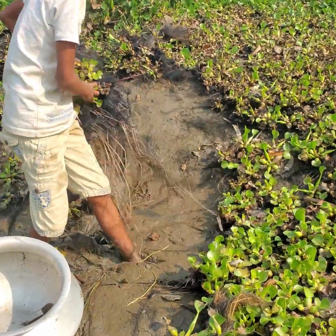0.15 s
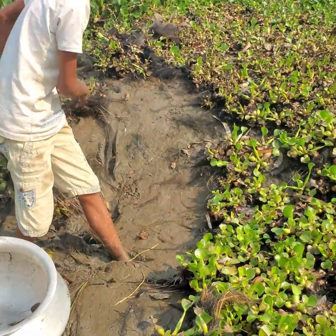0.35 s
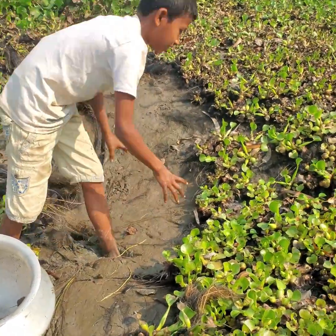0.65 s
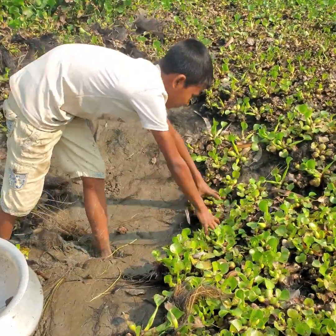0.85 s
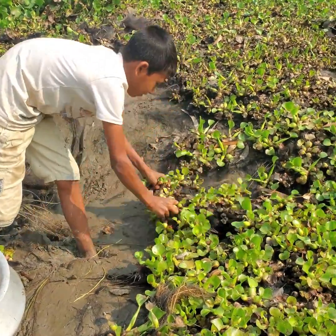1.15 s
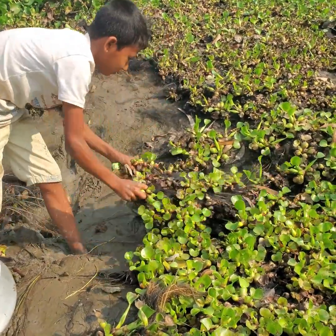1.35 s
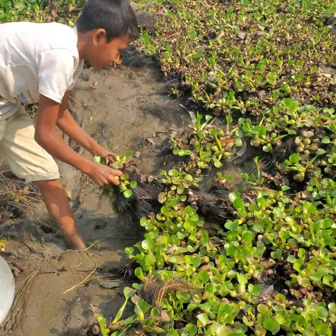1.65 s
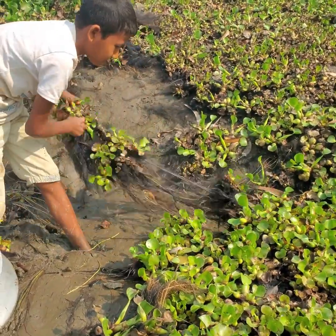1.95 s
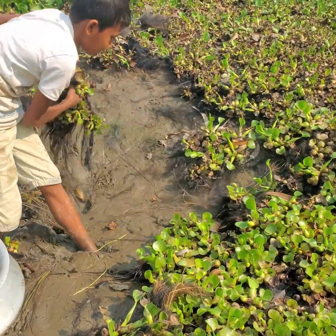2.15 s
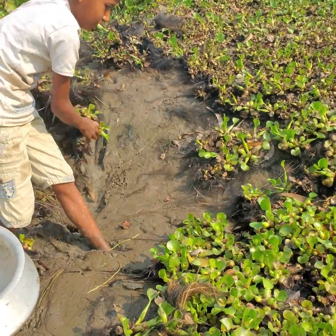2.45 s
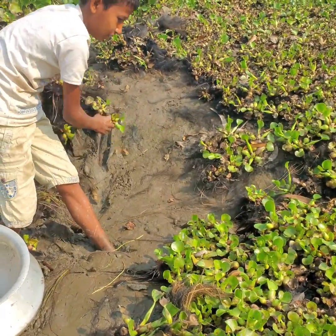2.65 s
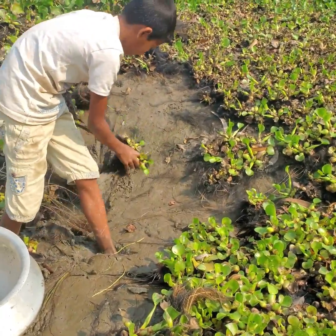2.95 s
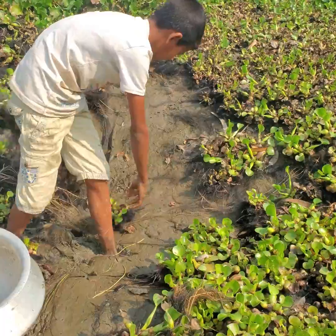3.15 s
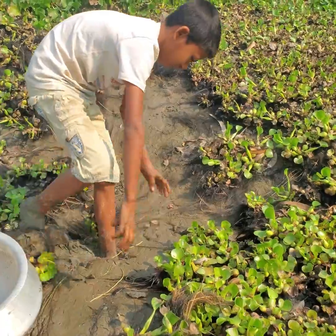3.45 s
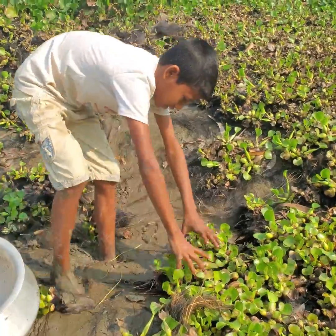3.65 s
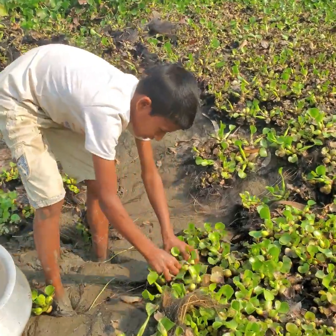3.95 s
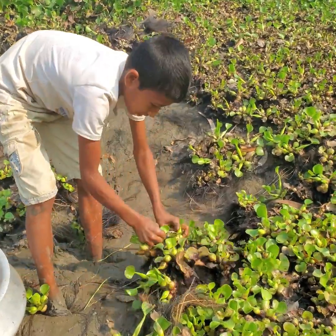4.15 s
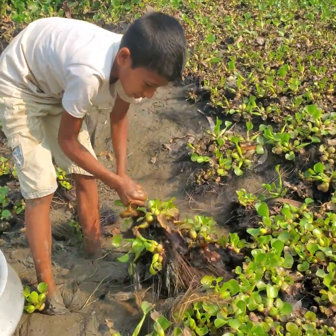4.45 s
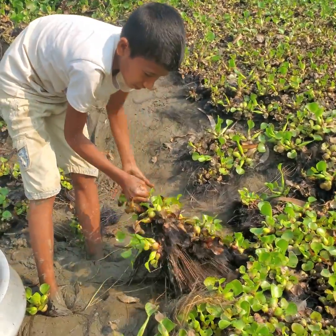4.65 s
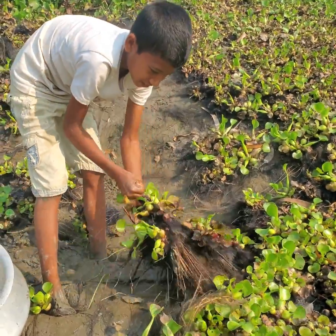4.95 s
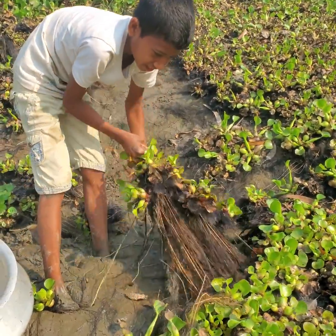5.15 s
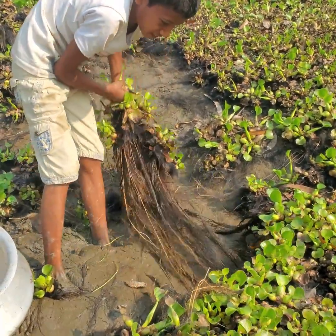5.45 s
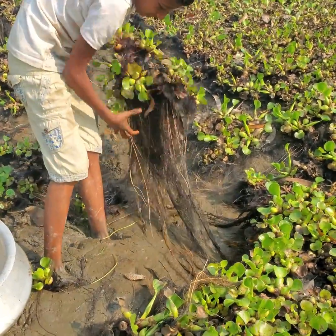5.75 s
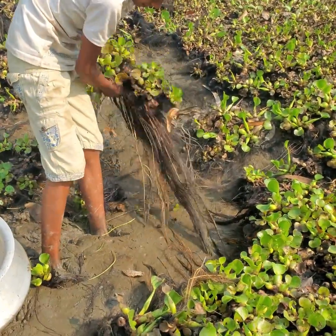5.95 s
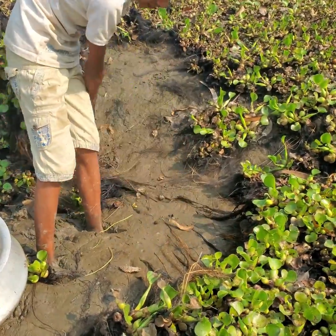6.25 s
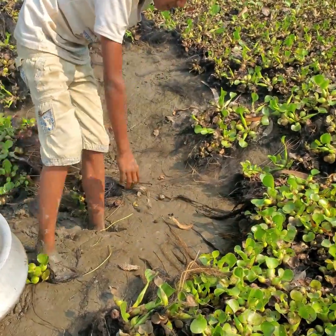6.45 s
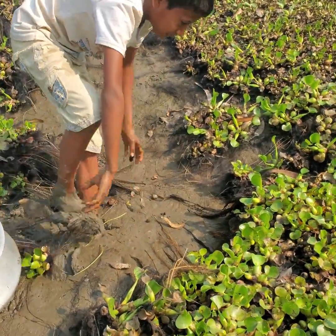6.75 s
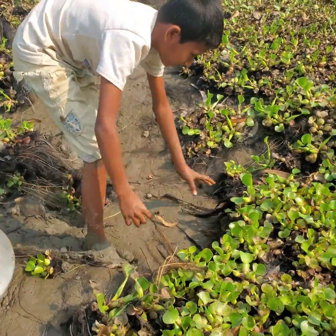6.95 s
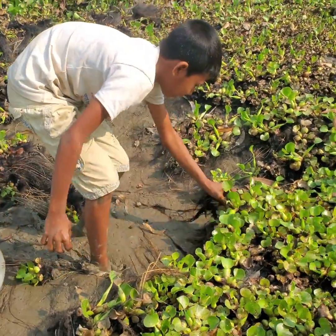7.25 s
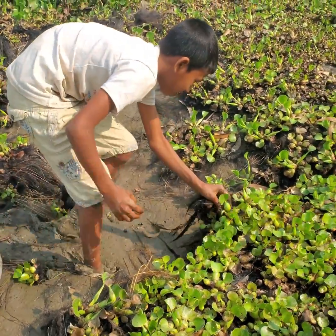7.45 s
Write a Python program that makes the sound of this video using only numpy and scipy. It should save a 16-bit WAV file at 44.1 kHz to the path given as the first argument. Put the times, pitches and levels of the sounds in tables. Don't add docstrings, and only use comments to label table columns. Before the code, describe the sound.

Outdoors at a quiet pond edge, heard very close in stereo. Leafy rustles and dry crackling fibres come in uneven tugs, densest midway, with sharp hollow stem snaps, duller root breaks and wet mud plops. Behind them are soft wind, a far low engine that fades away, quick sliding bird whistles to the right, and late, a faint insect chirr. The tearing continues to the end.

```python
import sys
import numpy as np
from scipy import signal
from scipy.fft import rfft, irfft, next_fast_len
from scipy.io import wavfile
from scipy.ndimage import uniform_filter1d, map_coordinates

SR = 44100
rng = np.random.default_rng(int(sys.argv[2]) if len(sys.argv) > 2 else 0)


def transcribe(signal):
    frames = np.atleast_2d(signal).T
    limited = np.clip(frames, -1, 1)
    pcm = np.round(limited * 32767).astype(np.int16)
    wavfile.write(sys.argv[1], SR, pcm)


def natural_amplitude(level_db):
    exponent = np.asarray(level_db, float) / 20
    return 10 ** exponent


N = 335326

# (time [s], fade time [s], leaves level [dB], root fizz over leaves [dB])
PULLS = [(.0, 0.22, -64, -4), (.3, 0.045, -56, -16), (.62, 0.31, -55.5, -5.5), (.95, 0.26, -49, -4),
         (1.2, 0.26, -50.5, -3), (1.46, 0.068, -55, -5), (1.67, 0.092, -54.5, -2.5),
         (1.93, 0.12, -57.5, -1.5), (2.13, 0.29, -54, -3), (2.5, 0.21, -60, -4.5), (2.94, 0.051, -54.5, -6),
         (3.22, 0.061, -49, -9), (3.34, 0.33, -54.5, -6), (3.82, 0.33, -49, -7), (3.99, 0.29, -46.5, -4.5),
         (4.11, 0.12, -45, -1), (4.443, 0.12, -46, -2), (4.89, 0.064, -46.5, -5.5),
         (5.079, 0.14, -49, -4.5), (5.28, 0.77, -61.5, -1), (5.787, 0.1, -55, 0),
         (5.98, 0.088, -54.5, -0.5), (6.295, 0.13, -57.5, -0.5), (6.529, 0.13, -51.5, -2),
         (6.661, 0.024, -51, 2), (6.983, 0.059, -51.5, -0.5), (7.35, 0.15, -54.5, -6.5),
         (7.6, 0.15, -58, -5)]


def plants():
    shake = wobble(35)
    return mud_smacks(shake) + leaves(shake) + root_fizz(shake)


def leaves(shake):
    # (frequency [Hz], level [dB per Hz])
    colour = [(700, -18), (1200, -18), (1700, -8), (2600, -2), (3500, 0.5), (4500, 4), (5900, -5.5),
              (7600, -11.5), (10000, -83)]
    level_db = swells([row[:3] for row in PULLS], idle_db=-71.5)
    grains = crackle(count=3000, hz=4170, octaves=0.52, cycles=10.4, spread_db=1.0)
    rustle = rush(colour, patchy_db=3.5) + 0.6 * grains
    return natural_amplitude(level_db + 4.5 + 2.34 * shake) * rustle


def root_fizz(shake):
    # (frequency [Hz], level [dB per Hz])
    colour = [(6000, -64), (8000, -8.5), (9500, 0.5), (11500, -2), (13000, -4.5), (15600, -10),
              (16800, -25)]
    efforts = [(s, 0.85 * fade_s, db + over_db) for s, fade_s, db, over_db in PULLS]
    level_db = swells(efforts, idle_db=-72)
    grains = crackle(count=1200, hz=11000, octaves=.5, cycles=2.5, spread_db=5.2)
    ticks = filtered(grains, lambda hz: natural_amplitude(along(colour, hz)))
    hiss = rush(colour, patchy_db=3.5)
    return natural_amplitude(level_db - 1.0 + 2.3 * shake) * (hiss + 0.66 * unit(ticks))


def mud_smacks(shake):
    # (time [s], fade time [s], level [dB])
    smacks = [(0, 0.2, -54), (.3, 0.17, -47.5), (.62, 0.073, -51), (.95, 0.45, -53), (1.55, 0.12, -59),
              (1.92, 0.43, -56.5), (2.2, 0.043, -46), (2.94, 0.2, -59), (3.34, 0.076, -48),
              (3.84, 0.31, -49), (4.11, 0.072, -47.5), (4.44, 0.092, -56), (4.88, 0.059, -49.5),
              (5.18, 0.35, -58), (5.79, 0.039, -54.5), (6.05, 0.17, -54.5), (6.5, 0.22, -53),
              (6.66, 0.011, -45), (6.98, 0.13, -52.5), (7.49, 0.12, -52)]
    # (frequency [Hz], level [dB per Hz])
    colour = [(200, -70), (400, -7), (900, -2), (1500, -5.5), (2200, -5), (4000, -24.5)]
    level_db = swells(smacks, idle_db=-69.0)
    grains = crackle(count=900, hz=1020, octaves=1.0, cycles=2.2, spread_db=-4.0)
    mud = rush(colour, patchy_db=4.0) + .5 * grains
    return natural_amplitude(level_db - 2.5 + 0.83 * shake) * mud


def snaps():
    # (time [s], peak level [dB], ring frequency [Hz], crack level [dB])
    stems = [(0.54, -28.5, 4300, -36), (1.0915, -26.5, 4900, -22), (1.2063, -23.5, 4300, -8),
             (1.3907, -29, 4700, -15.5), (1.4527, -21, 4380, -13), (1.503, -32, 4650, -32),
             (2.1036, -24.5, 5700, -13), (2.134, -28.5, 4600, -29), (2.4408, -40, 5500, -32),
             (2.952, -28.5, 4140, -21), (3.32, -28.5, 4600, -28), (3.5877, -33.5, 4450, -11.5),
             (3.8358, -18.5, 4800, -11), (4.0142, -24, 4760, -21), (4.0692, -22, 4530, -19),
             (4.1254, -26.5, 4600, -23), (4.4353, -20, 3700, -15), (4.4557, -24.5, 3600, -19),
             (4.4892, -19.5, 4330, -14), (5.035, -37, 3970, -11), (5.0886, -26, 3770, -32),
             (5.2060, -15.5, 4400, -16), (5.3125, -33.5, 5150, -22), (5.3655, -32, 4530, -17),
             (5.7317, -31, 4260, -27), (6.044, -24, 4100, -33), (6.0545, -12.5, 4960, -22),
             (6.1055, -30.5, 4100, -26), (6.651, -27.5, 5900, -15), (7.3118, -27.5, 3900, -17)]
    # (time [s], peak level [dB], ring frequency [Hz], crack level [dB])
    roots = [(0.2965, -41, 2270, -5.5), (1.072, -28, 4200, -16), (1.6527, -36, 3200, -9),
             (2.8432, -36.5, 2710, -37), (2.9243, -42, 2600, -8), (3.174, -35, 2870, -35),
             (3.203, -32, 3160, -31), (3.2276, -24, 2660, -31), (3.2797, -30.5, 3150, -1),
             (3.2873, -36, 3020, -4), (3.6607, -31, 3940, -20), (4.401, -28, 3050, -17),
             (4.5172, -22.5, 3080, -11.5), (4.8876, -24, 3500, -18), (5.449, -40.5, 3850, -15),
             (5.7902, -32.5, 2760, -26), (6.118, -27.5, 3170, -19), (6.965, -41, 2400, -18),
             (7.5094, -39, 3160, -30)]
    # (time [s], peak level [dB], ring frequency [Hz], crack level [dB])
    thick = [
        (1.5462, -40.5, 2470, -14),
        (2.166, -30, 1860, -23),
        (2.1928, -23.5, 2110, -40),
        (3.3364, -28, 1560, -20),
        (5.9832, -30.5, 2280, -24),
        (6.055, -18.5, 2240, -24),
        (6.9842, -27, 2050, -30),
        (7.3514, -32, 1620, -30),
        (7.42, -24.5, 2000, -19.5),
    ]
    out, t = np.zeros((2, N)), np.arange(2048) / SR
    f = np.fft.rfftfreq(2048, 1 / SR)
    delayed = lambda s: np.exp(-2j * np.pi * f * s)
    stalk = lambda hz, wide: 1j * f * wide / (hz * hz - f * f + 1j * f * wide)
    fade = (natural_amplitude(-60 * t / 0.0061) + 0.36 * natural_amplitude(-60 * t / 0.034)) * (1 - np.exp(-t / 0.0011))
    for s, db, hz, crack_db in stems + roots + thick:
        noise = rng.standard_normal((3, 2048))
        tearing = (1.5 * noise[0] + 2.04 * noise[1:]) * fade
        burst = rfft(tearing) + 9 * delayed(.0003)
        burst = burst * delayed(np.array([[0], [.00003]]))
        body = 0.36 * stalk(3000, 4400) / (1 + 0.51 * hz / (1j * f + 1)) ** 2
        ring = irfft(burst * (stalk(hz, 0.26 * hz) - body) / (1 + 1j * f / 8000) ** 3)
        crack = irfft(burst * stalk(11140, 4000) ** 2)
        sound = ring / abs(ring).max() + natural_amplitude(crack_db + 12.5) * crack / abs(crack).max()
        add(out, natural_amplitude(db + 0.5) * sound, s)
    return out


def fibres():
    # (time [s], peak level [dB], frequency [Hz])
    single = [(0.0328, -43, 4250), (0.2209, -39.5, 4440), (0.2777, -36, 4330), (0.3114, -34.5, 4420),
              (0.4903, -39, 4880), (0.5362, -29, 4700), (0.606, -35, 4750), (0.919, -30, 4850),
              (0.9555, -37, 4410), (1.2062, -20.5, 4530), (1.3608, -64, 4860), (1.4512, -14.5, 4160),
              (1.504, -30, 4600), (1.6232, -35, 2570), (1.6801, -35, 4550), (2.1036, -25, 5460),
              (2.183, -24.5, 3880), (2.4404, -29.5, 5300), (2.547, -33, 2840), (2.8804, -46, 4760),
              (2.9241, -46, 2570), (3.1627, -52, 2570), (3.1756, -49, 2880), (3.2236, -44, 2800),
              (3.232, -33, 3200), (3.2667, -30, 4530), (3.294, -30, 4040), (3.6129, -36, 3890),
              (3.9993, -25, 4830), (4.0146, -26, 4640), (4.1249, -25, 4600), (4.1684, -26.5, 4450),
              (4.2755, -40.5, 2080), (4.2854, -39, 2050), (4.3225, -35, 4790), (4.335, -33, 3640),
              (4.4022, -35, 3060), (4.4574, -26, 3800), (4.5645, -33, 4720), (4.6123, -39, 3280),
              (4.977, -36, 3490), (5.036, -33, 4000), (5.1394, -32.5, 2470), (5.2693, -37, 5080),
              (5.3244, -34, 3310), (5.665, -34.5, 3900), (6.27, -45, 4560), (6.333, -35.5, 2820),
              (6.4313, -38, 3190), (6.4956, -32, 4500), (6.5181, -28, 4800), (6.573, -27.5, 4100),
              (6.9636, -35.5, 2430), (7.1487, -48, 2290), (7.3517, -37, 1960), (7.5082, -34, 3160),
              (7.5502, -39, 5030),
              (5.2036, -24, 3600),
        (5.2063, -18, 3300),
        (3.196, -36, 2900),
        (3.211, -36, 3200),
        (3.217, -38, 2600),
        (3.241, -37, 2700),
        (3.3705, -38, 4300),
        (.2992, -33, 1030),
        (3.205, -35, 2500),
        (3.19, -40, 2450),
    ]
    creak = [(.3415 + k * .0118 * (1 + k / 100), -39, 1400 - k * 60) for k in range(7)]
    out, t = np.zeros((2, N)), np.arange(768) / SR
    lag = np.array([[0], [.00003]])  # left, right [s]
    for s, db, hz in single + creak:
        rise_s = 0.00029 * np.sqrt(4500 / hz)
        u = np.maximum(t - lag, 0) / rise_s
        click = (u * np.exp(1 - u)) ** 2 * np.sin(2 * np.pi * hz * (t - lag))
        wisp = signal.lfilter(*signal.iirpeak(hz, 2, SR), rng.standard_normal((2, 768)))
        add(out, natural_amplitude(db - 2) * (click + 0.86 * wisp * natural_amplitude(-60 * t / 0.019)), s)
    return out


def root_hairs():
    # (time [s], peak level [dB])
    hairs = [(0.1464, -36), (0.1935, -43), (0.2942, -33.5), (0.4165, -51), (0.5152, -39), (0.7282, -45),
             (1.1737, -44), (1.2965, -33.5), (1.5224, -41), (1.8457, -39), (2.0383, -45), (2.2807, -35.5),
             (2.8025, -44), (2.81, -43), (3.0624, -47), (3.1911, -44), (4.2263, -36), (4.335, -34),
             (4.7706, -41), (5.0729, -41), (5.3692, -32), (6.0327, -43), (6.2612, -38), (6.2975, -32),
             (6.4203, -43), (6.7236, -40), (7.0484, -37)]
    out, t = np.zeros((2, N)), np.arange(768) / SR
    high = signal.butter(2, [7000, 15000], "band", fs=SR)
    fade = natural_amplitude(-60 * t / 0.016) * (1 - np.exp(-t / 0.0007))
    for s, db in hairs:
        spit = signal.lfilter(*high, rng.standard_normal((2, 768))) * fade
        add(out, natural_amplitude(db - 2.5) * spit / abs(spit).max(), s)
    return out


def pops():
    # (time [s], peak level [dB], frequency [Hz])
    pockets = [(0.299, -27.5, 950), (0.449, -35.5, 277), (0.535, -29.5, 1530), (0.923, -30.5, 490),
               (1.208, -35, 920), (1.452, -32, 887), (2.191, -39, 1240), (3.334, -26, 677),
               (3.409, -33, 706), (3.438, -35.5, 570), (3.712, -32, 624), (3.904, -33.5, 940),
               (4.432, -37, 312), (4.492, -23, 298), (5.059, -34.5, 456), (6.051, -19.5, 241),
               (6.109, -21, 930), (6.295, -33.5, 950), (6.655, -34, 566), (6.979, -35, 1540),
               (7.485, -30.5, 635), (7.419, -25, 643), (7.467, -34, 596), (0.896, -37, 427),
               (1.251, -41, 1030), (1.52, -38, 1410), (1.599, -40.5, 1110), (1.921, -38, 754),
               (2.208, -28, 1230), (3.283, -41, 1270), (3.369, -35, 583), (4.098, -36, 1480),
               (4.167, -35.5, 1241), (5.19, -46, 545), (5.919, -47, 510), (5.985, -40, 600),
               (6.019, -43, 600), (6.201, -40, 530), (7.233, -43, 1010), (7.49, -42, 1140)]
    out, t = np.zeros((2, N)), np.arange(2048) / SR
    dull = signal.butter(2, [200, 1800], "band", fs=SR)
    for s, db, hz in pockets:
        cycles = hz * t * (1 + 0.0068 * hz * t)
        splat = signal.lfilter(*dull, rng.standard_normal(2048)) * natural_amplitude(-60 * t / 0.05)
        ring = natural_amplitude(-1.2 * cycles - 60 * t / 0.041) * np.sin(2 * np.pi * cycles)
        add(out, natural_amplitude(db - 3.0) * (1 - np.exp(-1.2 * cycles)) * (ring + 0.99 * splat), s - .001)
    return out


def gurgles():
    # (time [s], length [s], start frequency [Hz], end frequency [Hz], level [dB])
    holes = [(6.497, .07, 480, 1850, -48), (1.58, .15, 1000, 1050, -65), (1.95, .08, 520, 450, -54),
             (.15, .17, 270, 305, -55), (.615, .06, 335, 350, -54), (.35, .08, 540, 510, -58),
             (.52, .07, 600, 610, -55), (6.41, .07, 500, 520, -55), (6.68, .14, 560, 520, -62),
             (6.89, .07, 560, 570, -59), (7.52, .09, 520, 600, -55)]
    out = np.zeros((2, N))
    for hole in holes:
        add(out, whistle(note(*hole), 0.0039, rough_db=3.0).real, hole[0])
    return out


def birds():
    out = np.zeros((2, N))
    for call in song():
        high = np.interp(call[:, 1].mean(), (3800, 3900), [0, 1])
        half_phase = (1.1 + (.4 - 1.1) * high) * np.array([[-1], [1]])
        ports = (whistle(call, 0.002, rough_db=3.5) * np.exp(1j * half_phase)).real
        add(out, ports * natural_amplitude([[0.4], [0.1]]) * natural_amplitude(-4.5 * high), call[0][0])
    t = np.arange(SR // 3) / SR
    banks = rng.standard_normal((2, len(t))) * (natural_amplitude(-60 * t / 0.25) + 2.5 * natural_amplitude(-60 * t / 0.07))
    echo = signal.fftconvolve(out, banks / np.linalg.norm(banks[0]), axes=1)[:, :N]
    return out + natural_amplitude(-4) * echo


def song():
    # (time [s], length [s], start frequency [Hz], end frequency [Hz], level [dB])
    slides = [(2.155, .125, 3970, 2650, -39), (2.232, .09, 4250, 3560, -46), (2.29, .07, 2550, 1870, -52),
              (4.732, .12, 3700, 2800, -35), (4.81, .065, 4400, 3700, -47), (4.89, .047, 2520, 2230, -46),
              (3.675, .045, 3990, 3460, -36), (2.92, .035, 2690, 2480, -48), (7.577, .04, 3850, 3550, -39),
              (2.05, .055, 3150, 3420, -37), (4.582, .09, 3150, 3320, -38), (7.405, .115, 3150, 3270, -34)]
    # (time [s], length [s], start frequency [Hz], end frequency [Hz], level [dB])
    dives = [
        (2.468, .125, 4020, 2430, -38),
        (5.08, .115, 3750, 2250, -41),
    ]
    # (time [s], length [s], start frequency [Hz], end frequency [Hz], level [dB])
    lifts = [(4.415, .055, 3450, 3700, -33), (7.245, .08, 3480, 3620, -45), (2.72, .035, 3500, 3800, -44),
             (2.748, .06, 3950, 4050, -37), (3.045, .09, 3630, 4400, -43), (3.352, .036, 4190, 4230, -36),
             (3.612, .08, 3860, 4010, -33), (3.67, .05, 4150, 4200, -35), (3.725, .1, 3480, 4130, -37),
             (3.81, .1, 4090, 4200, -35), (3.93, .09, 3750, 4030, -40), (2.74, .06, 3500, 3560, -48),
             (4.34, .045, 3550, 3650, -44), (3.322, .035, 4900, 4050, -42), (3.188, .025, 3000, 2750, -44),
             (2.72, .02, 5800, 6150, -54), (5.54, .045, 2600, 2680, -52), (2.77, .06, 4750, 4980, -47),
             (1.985, .06, 3320, 3150, -51)]
    # (time [s], length [s], top frequency [Hz], level [dB])
    chips = [
        (1.825, .08, 3700, -43),
        (2.793, .037, 3080, -38),
        (3.1, .038, 3140, -39),
        (3.387, .03, 3200, -38),
    ]
    # (time [s], length [s], top frequency [Hz], level [dB])
    peeps = [
        (2.465, .045, 2600, -54),
        (2.72, .035, 2400, -50),
        (3.035, .03, 2400, -53),
        (5.06, .03, 2460, -53),
    ]
    kinds = [(slides, (.6, 1.3)), (dives, (.54, 2.2)), (lifts, (.25, 1.3))]
    notes = [note(*row, shape=shape) for rows, shape in kinds for row in rows]
    octaves = [(s, length, 2 * hz, db + 6.5) for s, length, hz, db in peeps]
    arches = chips + peeps + octaves
    return notes + [note(s, length, hz, hz, db, arch=0.087) for s, length, hz, db in arches]


def insect():
    # (time [s], fade time [s], level [dB])
    chirrs = [
        (6.62, .15, -65),
        (6.86, .3, -62),
        (7.12, .15, -63),
        (7.52, .15, -61),
    ]
    # (frequency [Hz], level [dB per Hz])
    band = [(1750, -60), (1930, 0), (2080, 0), (2300, -60)]
    return natural_amplitude(swells(chirrs, idle_db=-90)) * rush(band, patchy_db=5.0)


def engine():
    # (time [s], firing frequency [Hz], load level [dB])
    run = [
        (0.0, 28.65, -52.5),
        (1.46, 29.22, -50),
        (1.82, 26.94, -49.5),
        (1.98, 28.65, -46.5),
        (3.43, 26.07, -55),
        (4.33, 24.56, -54),
        (5.6, 22.23, -67),
    ]
    orders = [-5, -12.5, -1.5, -9.5, -15]
    hz, load_db = curves(run)
    turns = 2 * np.pi * np.cumsum(hz) / SR
    gone_db = -25 * np.clip(np.arange(N) / SR - run[-1][0], 0, 1)
    out = np.zeros(N)
    for order, db in enumerate(orders, start=2):
        boom_db = 21 * np.exp(-((order * hz - 78.3) / 11.5) ** 2)
        level_db = load_db + db + boom_db + 2.0 + gone_db + 2.8 * wobble(5.23)
        out += natural_amplitude(level_db) * np.sin(order * turns + 0.27 * wobble(4.09))
    return out


def wind():
    # (time [s], level [dB])
    steady = [
        (0, -37),
        (1.3, -34.5),
        (1.7, -38.5),
        (5, -37.5),
        (7.6, -39),
    ]
    # (frequency [Hz], level [dB per Hz])
    low = [(13, -76), (22, -17), (65, 6.5), (108, 0), (125, -5.5), (243, -19), (400, -31), (520, -48),
           (880, -120)]
    # (time [s], level [dB])
    gusts = [
        (0, -59),
        (.22, -55),
        (.7, -66.5),
        (1.5, -96),
        (3.8, -77),
        (4.1, -66.5),
        (4.6, -77),
        (7.6, -71),
    ]
    # (frequency [Hz], level [dB per Hz])
    flap = [(90, -44), (170, -5.5), (300, -3.5), (450, -14.5), (900, -62)]
    rumble = natural_amplitude(curves(steady)[0] - 8.5 + 1.9 * wobble(6)) * rush(low, patchy_db=0.65)
    return rumble + natural_amplitude(curves(gusts)[0] + 2.4 * wobble(24)) * rush(flap, patchy_db=-0.5)


def field_hush():
    # (frequency [Hz], level [dB per Hz])
    colour = [(150, -30), (250, -35), (425, -8.5), (516, 2), (889, -14.5), (1100, -9), (1330, -26),
              (2640, -6), (3490, -7), (7000, -14.5), (9100, -62), (15400, -120)]
    return natural_amplitude(-61.5 + 0.49 * wobble(3.6)) * rush(colour, patchy_db=2.5)


def whistle(rows, edge_s, rough_db):
    s, hz, db = np.transpose(rows)
    t = np.arange(s[0], s[-1], 1 / SR)
    knot_s = np.arange(60) * .0035
    flutter, waver = (np.interp(t - s[0], knot_s, knots) for knots in rng.standard_normal((2, 60)))
    edge = np.clip(np.minimum(t - s[0], s[-1] - t) / edge_s, 0, 1)
    pitch = np.interp(t, s, hz) * (1 + 0.0075 * waver)
    return natural_amplitude(np.interp(t, s, db) + rough_db * flutter) * edge * np.exp(2j * np.pi * np.cumsum(pitch) / SR)


def note(s, length, from_hz, to_hz, db, shape=(.6, 1.3), arch=0):
    u = np.linspace(0, 1, 14)
    half, steep = shape
    done, left = (u / half) ** steep, ((1 - u) / (1 - half)) ** steep
    hz = from_hz + (to_hz - from_hz) * done / (done + left)
    sag = 1 - arch * (2 * u - 1) ** 2
    quieter_db = np.interp(u, [0, .45, 1], [7 ** .5, 0, 13 ** .5]) ** 2
    return np.transpose([s + length * u, hz * sag, db - quieter_db])


def crackle(count, hz, octaves, cycles, spread_db):
    when, tone, size, side = rng.random((count, 4)).T
    clump = np.cumsum(natural_amplitude(7 * wobble(30)))
    start = np.interp(when, clump / clump[-1], np.arange(N)).astype(int)
    pitch = np.clip(hz * 2 ** (octaves * (2 * tone - 1)), 100, 15000)[:, None]
    turns = pitch * np.arange(200) / SR
    level_db = -spread_db * np.log(0.084 + size)[:, None]
    grains = natural_amplitude(level_db - 60 * turns / cycles) * np.sin(2 * np.pi * turns)
    lag = (8 * side - 5).astype(int)

    def place(at):
        spots = np.clip(at, 0, N)[:, None] + np.arange(200)
        return np.bincount(spots.ravel(), grains.ravel(), N + 201)[:N]

    return unit(np.array([place(start + lag), place(start)]))


def rush(spectrum, patchy_db):
    # (frequency [Hz], left-right likeness [0 to 1])
    alike = [(30, 1), (90, 0.96), (200, 0.83), (550, 0.52), (1650, 0.023), (4970, 0.022), (15000, 0.018)]
    z = signal.stft(rng.standard_normal((2, N)), nperseg=256)[2]
    patches = uniform_filter1d(rng.standard_normal(z.shape[1:]), size=5, axis=0)
    patches = unit(uniform_filter1d(patches, size=5, axis=1))
    pair = signal.istft(z * natural_amplitude(patchy_db * patches), nperseg=256)[1][:, :N]

    def mid_side(hz):
        turn = np.arccos(np.clip(along(alike, hz), -1, 1)) / 2
        return natural_amplitude(along(spectrum, hz)) * [np.cos(turn), np.sin(turn)]

    mid, side = filtered(pair, mid_side)
    return unit(np.array([mid + side, mid - side]))


def swells(rows, idle_db):
    s, fade_s, db = np.transpose(rows)[..., None]
    t = np.arange(0, N + 64, 64) / SR
    away = np.maximum(t - s, (s - t) / 0.67)
    power = natural_amplitude(2 * idle_db) + natural_amplitude(2 * (db - 11.5 * away / fade_s)).sum(axis=0)
    return np.interp(np.arange(N) / SR, t, 10 * np.log10(power))


def unit(x):
    return x / np.sqrt(np.mean(x ** 2) + 1e-20)


def along(points, hz):
    f, v = np.transpose(points)
    return np.interp(np.log(hz + 1), np.log(f + 1), v)


def curves(rows):
    s, *cols = np.transpose(rows)
    return [np.interp(np.arange(N) / SR, s, c) for c in cols]


def wobble(rate):
    knots = rng.standard_normal(int(N * rate / SR) + 4)
    return map_coordinates(knots, [np.arange(N) * rate / SR])


def filtered(x, response):
    m = next_fast_len(N + 8192)
    return irfft(rfft(x, m) * response(np.fft.rfftfreq(m, 1 / SR)), m)[..., :N]


def add(track, sound, s):
    part = track[:, round(s * SR):][:, :sound.shape[-1]]
    part += sound[..., :part.shape[1]]


def scene():
    hands = plants() + snaps() + fibres() + root_hairs() + pops() + gurgles()
    return hands + birds() + insect() + engine() + wind() + field_hush()


def band_limit(x):
    return signal.sosfilt(signal.butter(12, 17010, fs=SR, output="sos"), x)


def record(dry):
    # (frequency [Hz], left over right [dB])
    balance = [(60, -1), (900, 0.6), (2400, -0.5), (3700, -1.5), (5000, -7.5), (8000, -1.5), (11500, -3),
               (14500, 16)]
    halves = np.array([[.5], [-.5]])
    mix = filtered(dry, lambda hz: natural_amplitude(along(balance, hz) * halves - 32 * (hz > 15850)))
    return band_limit(mix)


dry = scene()
out = record(dry)
transcribe(out)
```